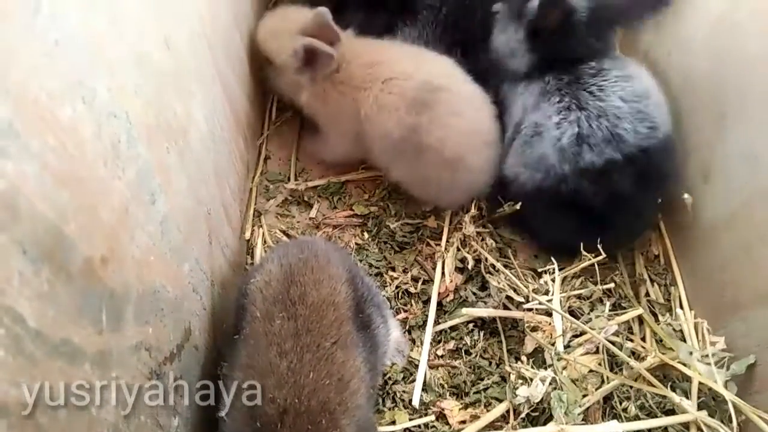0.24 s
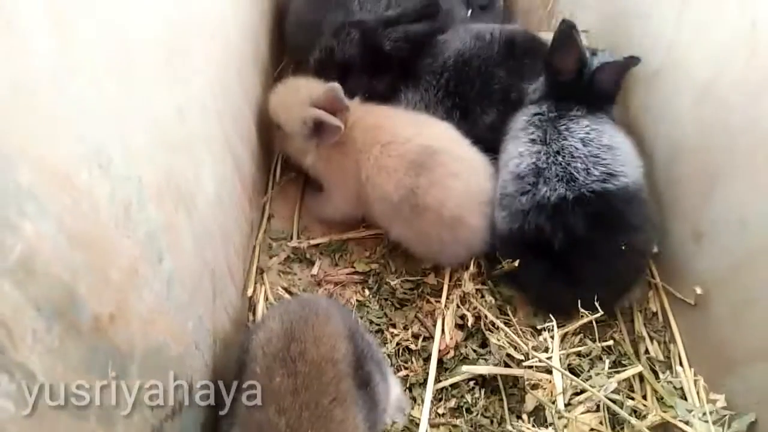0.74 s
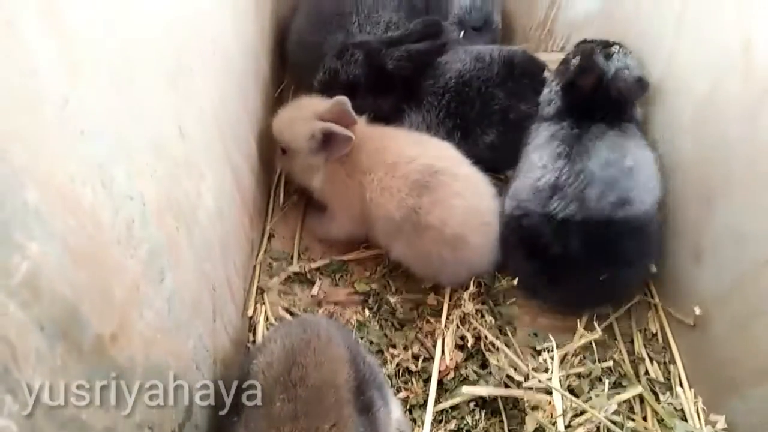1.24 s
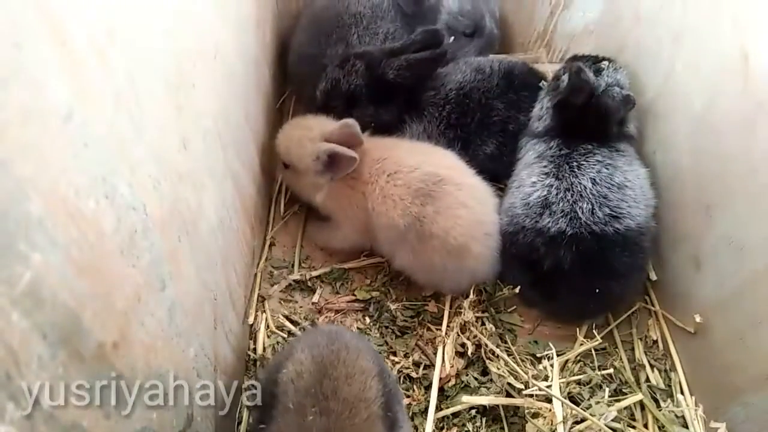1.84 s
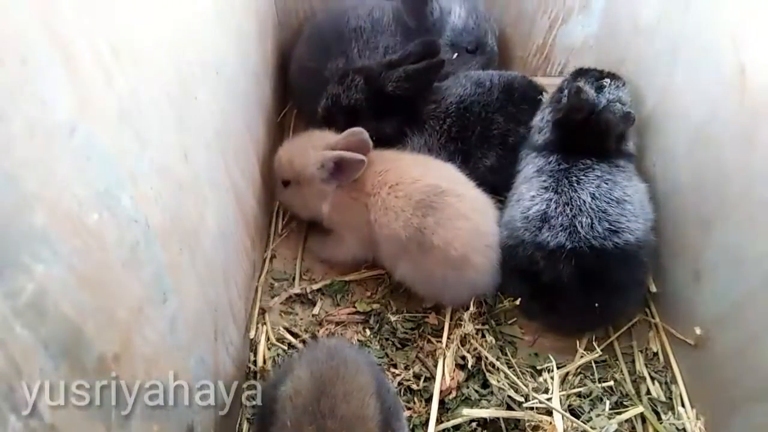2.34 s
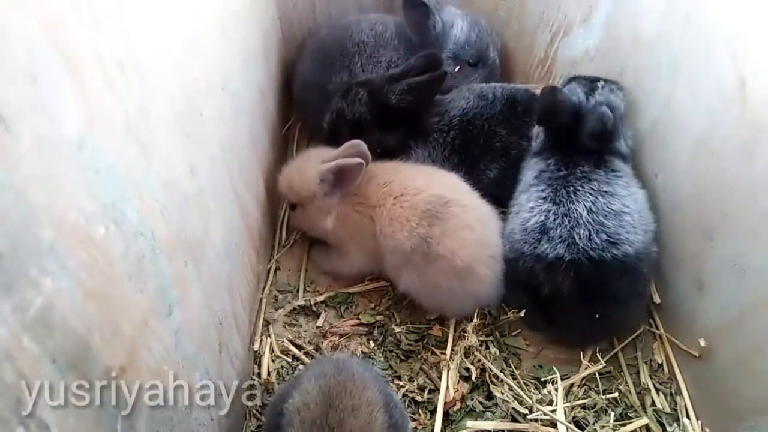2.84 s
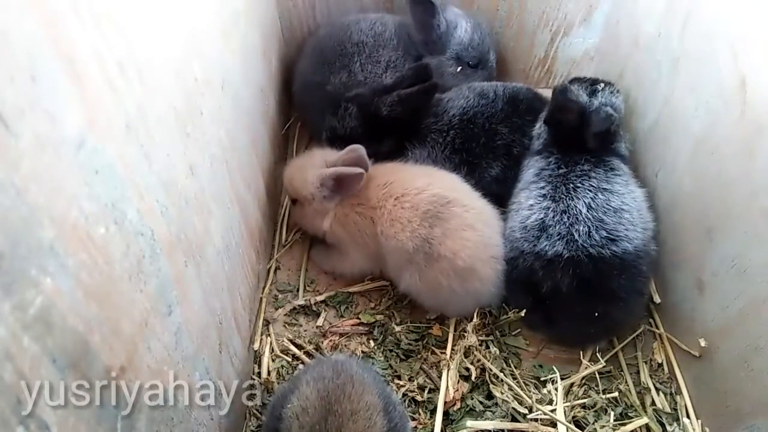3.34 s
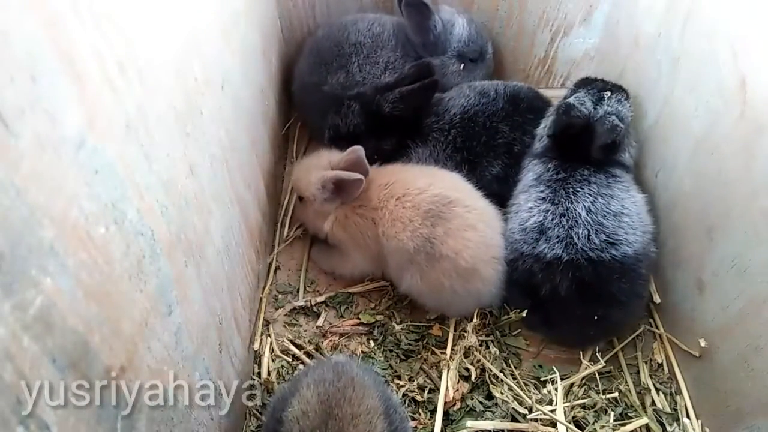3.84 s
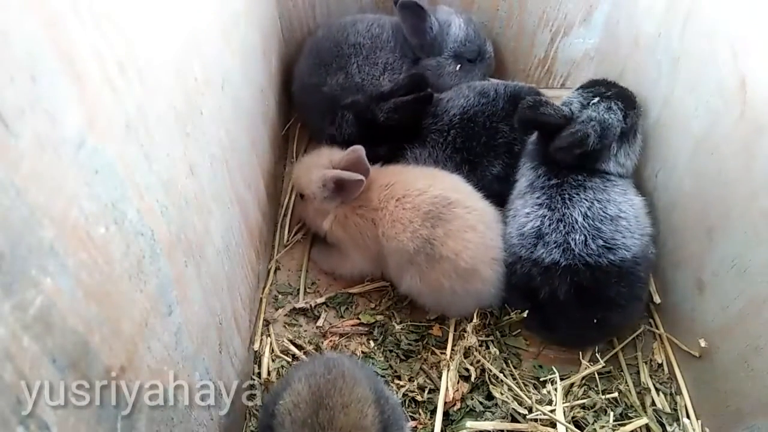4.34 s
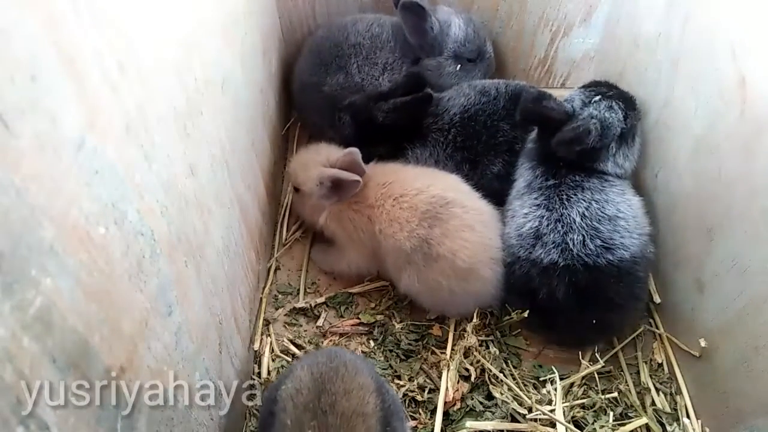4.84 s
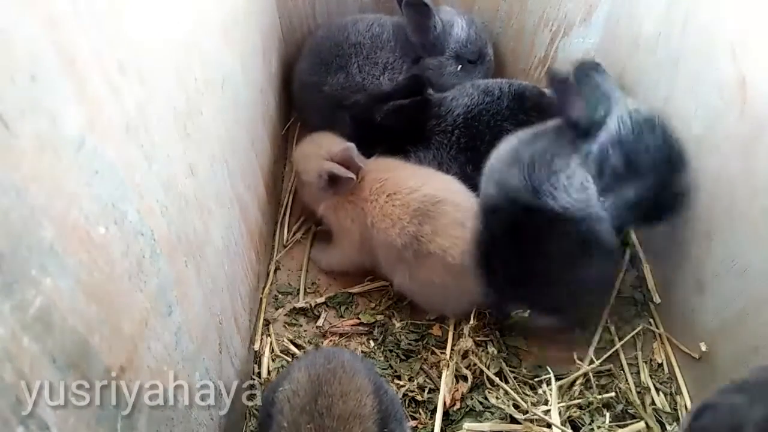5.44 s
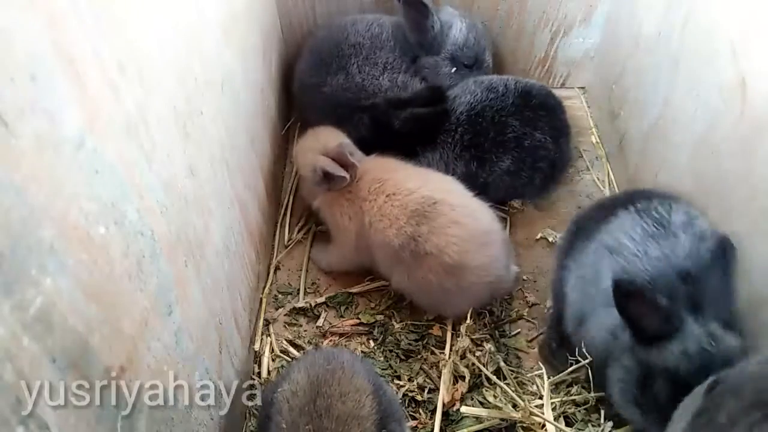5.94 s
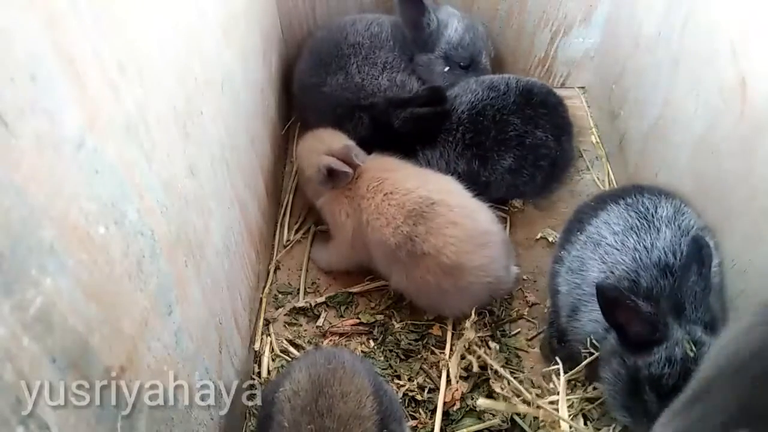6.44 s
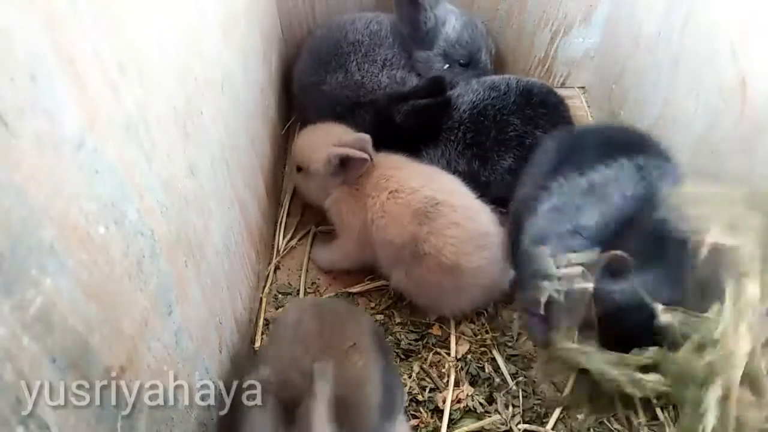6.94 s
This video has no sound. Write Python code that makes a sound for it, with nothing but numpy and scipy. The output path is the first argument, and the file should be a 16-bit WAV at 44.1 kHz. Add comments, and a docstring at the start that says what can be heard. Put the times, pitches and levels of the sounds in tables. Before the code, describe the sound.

Small rabbits move about in dry hay in a narrow wooden box. Uneven crackling, stalk snaps, dull paw knocks and short squeaky claw scrapes fill the first three seconds. Things calm, a brief knock and rustle return, then near quiet with tiny ticks. A rustle leads into the loudest, thickest shuffling at the end. Close microphone, boxy resonance, faint hum, low rumble and very high thin whistles.

```python
"""Young rabbits shuffle in dry hay in a narrow wooden box, over far rumble, faint hum and thin whistles.
For three seconds stalks crackle as random friction breaks, snaps ring as short resonant noise bursts,
paws knock the boards (damped resonances) and claws make a board sing (narrow gliding resonances).
The hay then calms; knocks and snaps return near 3.7 s, and a quieter stretch follows.
A rustle near 5.8 s leads to the thickest shuffling, with snaps and singing claws, from 6.7 s to the end."""
import sys
import numpy as np
from scipy import signal
from scipy.io import wavfile
from scipy.ndimage import uniform_filter1d

SR = 44100
rng = np.random.default_rng(int(sys.argv[2]) if len(sys.argv) > 2 else 0)


def wav_record(signal):
    """Record a signal, one row per channel, as 16-bit PCM in the file named by sys.argv[1]."""
    frames = np.transpose(np.atleast_2d(signal))
    bounded = np.clip(frames, -1, 1)
    # unit amplitude maps onto the largest positive 16-bit level
    quanta = np.round(bounded * 32767).astype(np.int16)
    wavfile.write(sys.argv[1], SR, quanta)


N = 317504

# relative spectral density of stalk noise before the box colours it: f/Hz, level/dB per Hz
STALK_SPECTRUM = [(300, -19), (520, -3), (750, 2), (1200, 0.5), (2500, -3), (4000, -15.5), (5500, -39.5)]


def from_db(db):
    """The decibel law for amplitudes: 20 dB is a factor of ten."""
    return 10 ** (np.asarray(db) / 20)


def rms_one(x):
    """Normalisation by mean power: scale to rms 1."""
    return x / np.sqrt(np.mean(x ** 2) + 1e-20)


def peak_at(x, db):
    """Normalisation by the largest excursion: scale to a peak level in dB."""
    return from_db(db) * x / np.abs(x).max()


def in_time(rows):
    """Linear interpolation: each column of a curve over t/s, one value per sample."""
    s, *columns = np.transpose(rows)
    return [np.interp(np.arange(N) / SR, s, c) for c in columns]


def band(x, low_hz, high_hz):
    """Band-pass filtering with gentle Butterworth slopes."""
    return signal.sosfilt(signal.butter(2, [low_hz, high_hz], "band", fs=SR, output="sos"), x)


def resonance(x, hz, width_hz):
    """A damped oscillator: two poles, with gain about 1 at the peak."""
    r = np.exp(-np.pi * width_hz / SR)
    numerator = [(1 - r * r) / 2, 0, (r * r - 1) / 2]
    denominator = [1, -2 * r * np.cos(2 * np.pi * hz / SR), r * r]
    return signal.lfilter(numerator, denominator, x)


def drift(rate_hz):
    """A slow random process: low-passed noise of rms 1, computed at every 40th sample."""
    step = 40
    r = np.exp(-2 * np.pi * step * rate_hz / SR)
    noise = rng.standard_normal(N // step + 2002)
    slow = signal.lfilter([1], [1, -2 * r, r * r], noise)[2000:]   # without the filter's run-in
    return np.interp(np.arange(N) / step, np.arange(len(slow)), rms_one(slow))


def coloured(sources, spectrum, patchy_db, patch_rate):
    """Subtractive synthesis: third-octave bands from two noises in turn, each flickering alone; rms 1."""
    out = 0
    edges = 25 * 2 ** np.arange(0, 9.6, 1 / 3)
    at_hz, level_db = np.transpose(spectrum)
    for k, (low, high) in enumerate(zip(edges, edges[1:])):
        log_centre = np.log(low * high) / 2
        gain_db = np.interp(log_centre, np.log(at_hz), level_db, left=-90, right=-90)
        if gain_db > -80:
            flicker_db = patchy_db * drift(patch_rate)
            out = out + from_db(gain_db + flicker_db) * band(sources[k % 2], low, high)
    return rms_one(out)


def uneven_sizes(spread_db):
    """Breaks of random sign whose levels above the smallest are exponentially distributed, with a cap."""
    above_db = spread_db * np.minimum(rng.exponential(1, N), 4)
    return from_db(above_db) * rng.choice([-1, 1], N)


def crackle(per_s, spread_db, clump_db, smooth):
    """Stick-slip friction: tiny random breaks plus smooth noise in two channels, swelling in clumps."""
    born = rng.random(N) < per_s / SR
    grains = rms_one(born * uneven_sizes(spread_db)) + smooth * rng.standard_normal((2, N))
    return grains * from_db(clump_db * drift(51))


def box(x, direct_db):
    """Standing waves: air and board modes in alternating polarity, added to the direct sound."""
    # modes of the air and boards of the box: f/Hz, width/Hz, level/dB
    modes = [(590, 45, 2), (770, 50, 4.5), (1170, 190, -5), (1550, 80, 0), (2066, 125, -1.5),
             (2668, 100, 4), (3380, 330, -13.5), (4340, 1700, -13.5)]
    rings = sum((-1) ** k * from_db(db) * resonance(x, hz, width) for k, (hz, width, db) in enumerate(modes))
    return rings + from_db(direct_db) * x


def stirring():
    """Power addition: exponential swells and fades over the settling hay; stalk and leaf levels in dB."""
    # restless settling between shuffles: t/s, stalk level/dB, leaf level/dB
    settling = [(0, -68, -88), (.6, -62, -81), (1.2, -81, -67.5), (1.45, -70, -103), (2.4, -102, -75),
                (3.5, -76, -88), (3.95, -69, -81), (4.2, -75, -88), (5.28, -74.5, -90), (5.42, -63.5, -74),
                (5.7, -62, -66), (6.0, -60.5, -65), (6.4, -74, -78.5), (7.2, -60, -57.5)]
    # shuffles of a body: time of peak t/s, swell/s, fade of stalks/s (each over span_db),
    # stalk peak level/dB, leaf peak level/dB
    shuffles = [(.04, 0.15, 0.38, -60.5, -63.5), (0.272, 0.028, 0.12, -48.5, -48.5),
                (0.799, 0.33, 0.076, -52.5, -51), (.95, 0.056, 0.31, -57.5, -64),
                (1.14, 0.033, 0.046, -45, -65.5), (1.27, 0.11, 0.038, -59, -65.5),
                (1.372, 0.073, 0.043, -57.5, -63.5), (1.582, 0.024, 0.16, -53.5, -59),
                (1.735, 0.038, 0.29, -56.5, -61), (1.91, 0.04, 0.16, -60, -87),
                (2.03, 0.032, 0.2, -54, -63), (2.15, 0.041, 0.12, -60, -59),
                (2.3, 0.081, 0.27, -60.5, -64.5), (2.535, 0.022, 0.093, -43.5, -46),
                (2.656, 0.16, 0.12, -47.5, -58), (2.883, 0.19, 0.15, -63.5, -61),
                (3.0, 0.024, 0.28, -69.5, -65.5), (3.1, 0.037, 0.35, -64.5, -82),
                (3.17, 0.025, 0.36, -79, -65.5), (3.301, 0.02, 0.19, -61.5, -67.5),
                (3.799, 0.18, 0.15, -51, -56), (4.29, 0.035, 0.14, -69, -71),
                (4.674, 0.098, 0.22, -65.5, -69), (5.36, 0.16, 0.33, -63.5, -79),
                (5.801, 0.071, 0.071, -47.5, -62), (6.2, 0.029, 0.12, -84, -57.5),
                (6.771, 0.043, 0.46, -45.5, -55.5), (6.951, 0.1, 0.17, -38, -44),
                (6.876, 0.071, 0.093, -40, -49.5), (7.054, 0.11, 0.11, -46, -47)]
    span_db = 20
    fade_speed = np.array([[1], [1.17]])   # stalks, leaves: leaves die away faster
    t = np.arange(N) / SR
    power = from_db(2 * np.array(in_time(settling)))
    for s, swell, fade, *peak_db in shuffles:
        down_db = span_db * np.where(t < s, (s - t) / swell, (t - s) / fade * fade_speed)
        near = down_db[0] < 3 * span_db
        power[:, near] += from_db(2 * (np.array(peak_db)[:, None] - down_db[:, near]))
    return 10 * np.log10(power)


def still_air():
    """Broadband noise: air coloured by a fixed spectrum, flickering band by band."""
    # relative spectral density: f/Hz, level/dB per Hz
    air_spectrum = [(30, -6), (45, 11), (110, -1.5), (220, -10.5), (330, -10), (800, -18), (1250, -10),
                    (2100, -32), (3300, -42), (5000, -45), (6400, -25), (9000, -46), (14000, -24)]
    noise = rng.standard_normal((2, N))
    return from_db(-68.5) * coloured(noise, air_spectrum, patchy_db=3.5, patch_rate=18)


def far_rumble():
    """Low band-passed noise under a slowly changing level."""
    # course of the rumble: t/s, level/dB
    rumble_course = [(0, -67), (.3, -59), (.62, -67.5), (1.9, -64.5), (2.59, -66), (2.85, -66.5),
                     (4.9, -68), (5.65, -67.5), (6.5, -70.5), (6.94, -70.5), (7.2, -63)]
    low = band(band(rng.standard_normal(N), 61, 156), 49, 200)
    return from_db(in_time(rumble_course)[0]) * rms_one(low * from_db(2.5 * drift(5)))


def hum():
    """Narrow-band noise: white noise passed twice through each resonance gives a wavering tone."""
    # lines of the hum: f/Hz, width of each pass/Hz, rms level/dB
    lines = [(835, 7.9, -79.5), (443.3, 19, -91.5), (3174, 31, -96)]
    out = 0
    for hz, width, db in lines:
        tone = resonance(resonance(rng.standard_normal(N), hz, width), hz, width)
        out = out + from_db(db) * rms_one(tone)
    return out


def whistles():
    """Frequency modulation: gliding sines, unsteady in pitch and level, that fade in and out."""
    # insect-like whistles: start t/s, end t/s, start f/Hz, end f/Hz, rms level before fades and waver/dB
    spells = [(-.1, .6, 12460, 12540, -81), (1.6, 3.5, 12980, 12820, -87), (2.5, 3.35, 12480, 12560, -76),
              (2.95, 3.5, 8720, 8530, -87), (5.2, 5.9, 12700, 12680, -84), (5.35, 6.5, 12460, 12590, -76)]
    edge_s, waver_hz, waver_db = .12, 6, 3   # fade length; rms waver of pitch and of level
    out, t = 0, np.arange(N) / SR
    for start, end, from_hz, to_hz, db in spells:
        hz = np.interp(t, [start, end], [from_hz, to_hz]) + waver_hz * drift(6)
        fades = np.clip(np.minimum(t - start, end - t) / edge_s, 0, 1)
        tone = np.sqrt(2) * np.sin(2 * np.pi * np.cumsum(hz) / SR)
        out = out + fades * from_db(db + waver_db * drift(5)) * tone
    return out


def creaking():
    """Load-driven friction: dull board noise follows the smoothed stirring of the stalks."""
    smoothing_s = 0.05
    load_db = uniform_filter1d(stirring()[0], int(smoothing_s * SR))
    creak_db = -63.5 + (load_db + 55)   # -63.5 dB when the stalks lie at -55 dB
    creak = rms_one(band(rng.standard_normal(N), 260, 500) * from_db(3 * drift(15)))
    return from_db(creak_db) * creak


def drags():
    """Stick-slip excitation: a claw's uneven jerks drive one narrow board resonance gliding in pitch."""
    # strokes: start t/s, end t/s, start f/Hz, end f/Hz, width of the narrower pole/Hz, rms level/dB
    strokes = [(.2, 0.323, 2600, 2385, 70, -64.5), (0.475, 0.673, 2160, 1965, 55, -62.5),
               (0.654, .85, 2043, 2090, 55, -63), (0.525, 0.712, 1000, 1122, 149, -55.5),
               (0.691, 0.842, 1111, 1040, 149, -54.5), (1.237, 1.302, 995, 990, 119, -62),
               (1.346, 1.405, 2060, 2100, 149, -64), (1.365, 1.41, 1035, 1023, 148, -63.5),
               (1.62, 1.718, 4030, 3900, 110, -78), (2.026, 2.123, 2095, 2110, 120, -67),
               (2.595, 2.715, 778, 737, 46.7, -48), (3.64, 3.735, 2880, 2900, 120, -65),
               (3.62, 3.75, 2520, 2500, 120, -68), (3.759, 3.835, 1212, 1204, 90, -51),
               (5.787, 5.844, 561, 573, 78.5, -57), (6.79, 6.912, 3410, 3340, 197, -49.5),
               (6.863, 6.896, 2063, 2006, 90, -40.5), (6.927, 6.953, 2656, 2654, 90, -38),
               (6.914, 6.971, 1590, 1510, 90, -44)]
    out = np.zeros(N)
    slips = crackle(1200, spread_db=2.0, clump_db=1.5, smooth=1.5)
    for start, end, from_hz, to_hz, width, db in strokes:
        at = slice(round(start * SR), round(end * SR))
        along = np.linspace(0, 1, at.stop - at.start)
        # a complex low-pass envelope, moved up to the gliding pitch
        keep = np.exp(-np.pi * width / SR)
        tremble = signal.lfilter([1], np.poly([keep, keep ** 2]), slips[0, at] + 1j * slips[1, at])
        hz = from_hz + (to_hz - from_hz) * along
        sung = np.real(tremble * np.exp(2j * np.pi * np.cumsum(hz) / SR))
        fades = np.minimum(np.minimum(along, 1 - along) / 0.14, 1)
        out[at] += from_db(db) * rms_one(sung * fades)
    return out


def thuds():
    """Impact on a heavily damped oscillator: a decaying push with a steady part bends the floor board."""
    # paws landing: t/s, peak level/dB, f/Hz, t60 of the push/s (taken as at least 0.01)
    landings = [(0.253, -45, 116, 0.04), (0.932, -34.5, 450, 0.068), (1.512, -55, 74, 0.053),
                (1.894, -36, 294, 0.094), (2.015, -33.5, 290, 0.07), (2.274, -34.5, 125, 0.17),
                (2.501, -36.5, 310, 0.16), (2.535, -39.5, 87, 0.0071), (3.715, -39.5, 142, 0.12),
                (5.635, -44, 183, 0.12), (7, -37, 224, 0.23)]
    size = SR // 4
    out, t = np.zeros(N + size), np.arange(size) / SR
    for (s, peak_db, hz, t60), noise in zip(landings, rng.standard_normal((len(landings), size))):
        push = (noise + 0.44) * from_db(-60 * t / max(t60, .01))
        board = band(resonance(push, hz, 0.5 * hz), 45, 860)
        out[round(s * SR):][:size] += peak_at(board, peak_db)
    return out[:N]


def snaps():
    """Impulsive excitation: a dying noise burst rings at its own pitch and in the box, with a bright crack."""
    # snaps of stalks and taps of claws: t/s, body peak level/dB, ring f/Hz, crack peak level/dB,
    # t60 of the body burst/s (decay taken as at least 0.004)
    breaks = [(0.033, -43.5, 1900, -45.5, 0.1), (0.257, -32.5, 763, -42, 0.053),
              (0.717, -41.5, 1070, -45, 0.027), (0.935, -29, 2370, -42, 0.026),
              (0.938, -21.5, 980, -20.5, 0.0058), (1.066, -43, 2300, -41, 0.018),
              (1.126, -29, 1160, -43, 0.024), (1.347, -46, 1100, -66, 0.057),
              (1.565, -34.5, 1890, -41, 0.02), (1.61, -43, 890, -56, 0.074),
              (1.718, -29.5, 1267, -44.5, 0.03), (1.787, -37.5, 1880, -42, 0.029),
              (1.898, -29.5, 990, -56, 0.024), (2.008, -35.5, 1810, -41, 0.038),
              (2.017, -36, 610, -48, 0.02), (2.085, -43, 1170, -51.5, 0.097),
              (2.136, -36.5, 1670, -35, 0.02), (2.24, -44, 1570, -48, 0.036),
              (2.28, -22.5, 1017, -37, 0.011), (2.295, -37, 1880, -48, 0.033),
              (2.454, -40.5, 1960, -48.5, 0.054), (2.505, -45, 1520, -47, 0.07),
              (2.528, -40, 1020, -31, 0.061), (2.541, -37, 3900, -26, 0.074),
              (2.573, -58, 710, -26.5, 0.011), (2.637, -32.5, 750, -62, 0.095),
              (2.746, -52, 2420, -58, 0.038), (2.891, -41.5, 1530, -70, 0.057),
              (2.988, -43, 2550, -61, 0.027), (3.088, -42, 1250, -86, 0.015),
              (3.268, -43, 1230, -76, 0.036), (3.349, -45.5, 2440, -53.5, 0.022),
              (3.722, -45, 910, -47.5, 0.087), (3.752, -27, 1020, -42, 0.043),
              (3.793, -24, 907, -31, 0.052), (3.968, -55.5, 1950, -59, 0.026),
              (4.085, -49, 1580, -99, 0.035), (4.104, -52.5, 2000, -70, 0.03),
              (4.194, -55.5, 1510, -79, 0.044), (4.277, -41.5, 2360, -51, 0.039),
              (4.457, -55.5, 2160, -74, 0.027), (4.665, -38, 1880, -42.5, 0.025),
              (4.696, -49, 1940, -55, 0.03), (4.734, -48, 1240, -61.5, 0.054),
              (4.826, -53, 1150, -73, 0.021), (4.942, -47, 1300, -82, 0.031),
              (5.198, -49.5, 1034, -95, 0.087), (5.326, -48, 2130, -63, 0.082),
              (5.386, -60, 3800, -58, 0.03), (5.441, -55, 3020, -60, 0.11), (5.543, -56, 1690, -77, 0.029),
              (5.616, -44.5, 1960, -57, 0.063), (5.712, -57, 1150, -55, 0.09),
              (5.756, -45.5, 1660, -50, 0.073), (5.773, -32.5, 2060, -45.5, 0.074),
              (5.796, -39, 1216, -51, 0.11), (5.819, -37, 2060, -67, 0.049), (5.885, -51, 2030, -52, 0.15),
              (6, -45, 1500, -48, 0.09), (6.048, -68, 1240, -51.5, 0.15), (6.115, -50, 2080, -78, 0.031),
              (6.153, -46.5, 1760, -75, 0.061), (6.278, -57, 1730, -65, 0.029),
              (6.461, -55.5, 3550, -61, 0.023), (6.618, -112, 907, -49, 0.023),
              (6.69, -50.5, 1010, -94, 0.041), (6.755, -39, 1390, -44.5, 0.063),
              (6.799, -33, 760, -41.5, 0.017), (6.93, -32, 754, -52, 0.067),
              (6.941, -26.5, 2600, -53, 0.04), (6.98, -25.5, 2350, -31, 0.027),
              (7.01, -38.5, 2720, -44, 0.035), (7.046, -30, 1330, -55, 0.038),
              (7.048, -30.5, 3640, -54, 0.052), (7.121, -40.5, 3400, -55, 0.027),
              (7.157, -44.5, 544, -33, 0.012)]
    size = SR // 8
    out, t = np.zeros(N + size), np.arange(size) / SR
    for (s, peak_db, hz, crack_db, t60), noise in zip(breaks, rng.standard_normal((len(breaks), 2, size))):
        shape = from_db(-60 * t / max(t60, .004)) * np.minimum(t / (0.078 * t60), 1)
        near = band(noise[0] * shape, .7 * hz, 2.1 * hz)
        near = band(band(near, .65 * hz, 2.3 * hz), .6 * hz, 2.5 * hz)
        wide_db = -6 + .4 * (peak_db + 32)   # a harder snap shakes more of the box
        body = resonance(near, hz, .13 * hz) + from_db(wide_db) * box(near, direct_db=-6)
        crack = band(band(noise[1] * shape ** 1.26, 4700, 18000), 3900, 16500)
        crack = crack + from_db(-3.5) * resonance(crack, 18000, 5200)   # lifts the top
        crack = crack + from_db(2.0) * resonance(noise[1] * shape, 3550, 580)   # the stalk rings briefly
        out[round(s * SR):][:size] += peak_at(body, peak_db) + peak_at(crack, crack_db)
    return out[:N]


def ticks(per_s, spread_db, cycles):
    """Poisson-like excitation: random small breaks each ring a few cycles at one of 16 pitches."""
    sizes = uneven_sizes(spread_db)
    born, dealt = rng.random(N) < per_s / SR, rng.integers(0, 16, N)
    pitches = np.geomspace(650, 3000, 16)
    at_hz, level_db = np.transpose(STALK_SPECTRUM)
    gains = from_db(np.interp(np.log(pitches), np.log(at_hz), level_db))
    out = 0
    for k, (hz, gain) in enumerate(zip(pitches, gains)):
        struck = sizes * born * (dealt == k) + 1e-18   # the tiny offset avoids slow arithmetic
        out = out + gain * resonance(resonance(struck, hz, hz / cycles), hz, hz / cycles)
    return rms_one(out)


def hay():
    """Friction noise through box modes: stalks rub and tick, brighter when pressed; leaves hiss above."""
    # relative spectral density of the leaves: f/Hz, level/dB per Hz
    leaf_spectrum = [(3500, -4), (4300, -1), (5500, -17), (7000, -1), (8500, 6), (11000, -0.5),
                     (13500, 4.5), (15000, 11.5)]
    stir_db, leaves_db = stirring()
    slips = crackle(2500, spread_db=3.0, clump_db=3.0, smooth=1.2)
    rub = coloured(slips, STALK_SPECTRUM, patchy_db=4.0, patch_rate=14)
    breaks = ticks(320, spread_db=3.8, cycles=12)
    stalks = rms_one(rms_one(box(rub, direct_db=-2)) + from_db(-6) * breaks)
    # the bright share grows with stirring up to a stalk level of -46 dB
    bright_db = np.minimum(1.2 * (stir_db + 46), 0) - 7.5
    stalks = stalks + from_db(bright_db) * band(slips[0], 2260, 4740)
    sliding = crackle(6000, spread_db=2.0, clump_db=.7, smooth=1.8)
    leaves = coloured(sliding, leaf_spectrum, patchy_db=2.0, patch_rate=21.5)
    return from_db(stir_db) * stalks + from_db(leaves_db) * leaves


def scene():
    """Superposition and interference: all sources add, and a few low pitches cancel at the microphone."""
    # pitches that cancel where the microphone hangs: f/Hz, width/Hz
    nulls = [(222, 27), (368, 67), (525, 35)]
    surroundings = still_air() + far_rumble() + hum() + whistles() + creaking()
    out = surroundings + drags() + thuds() + snaps() + hay()
    for hz, width in nulls:
        out = out - resonance(out, hz, width)
    return out[None]


def record(dry):
    """Low-pass filtering: two steep Chebyshev filters end the treble."""
    mic_top_hz, cutoff_hz = 14550, 15622   # stopband edges
    dull = signal.sosfilt(signal.cheby2(14, 28, mic_top_hz, fs=SR, output="sos"), dry)
    return signal.sosfilt(signal.cheby2(12, 70, cutoff_hz, fs=SR, output="sos"), dull)


dry = scene()
out = record(dry)
wav_record(out)
```